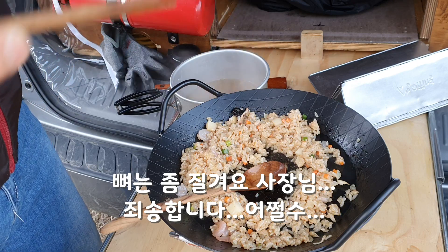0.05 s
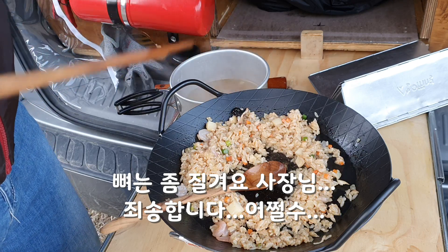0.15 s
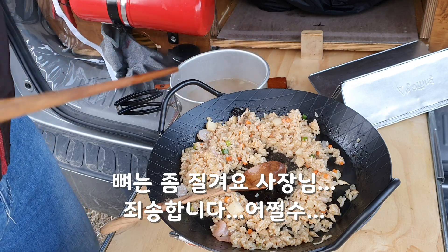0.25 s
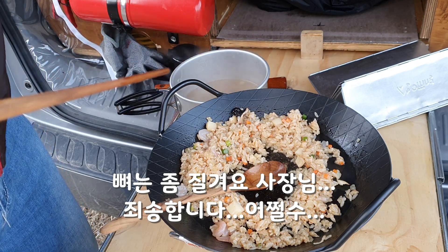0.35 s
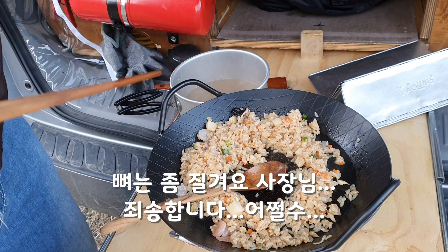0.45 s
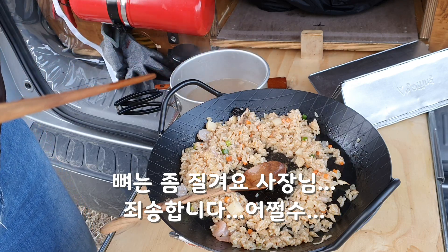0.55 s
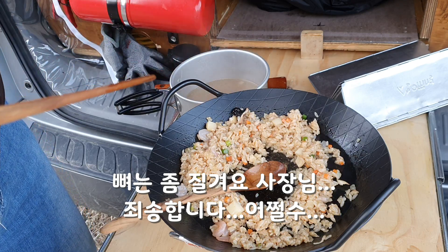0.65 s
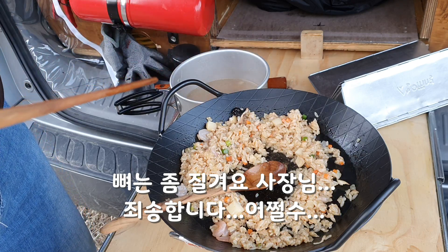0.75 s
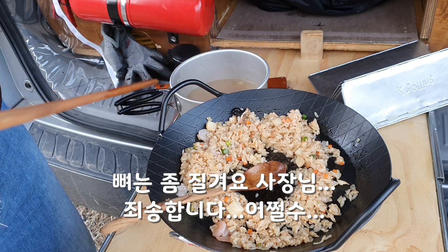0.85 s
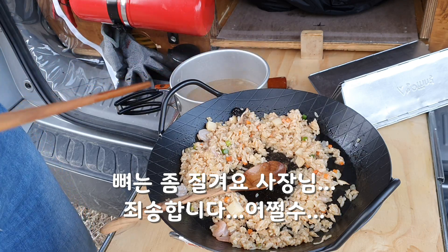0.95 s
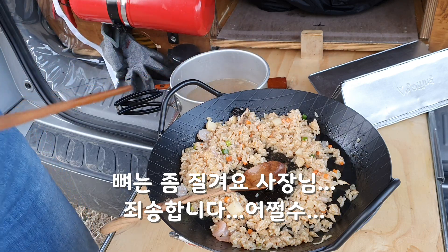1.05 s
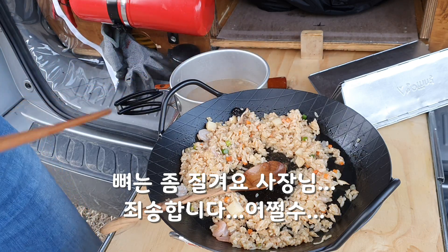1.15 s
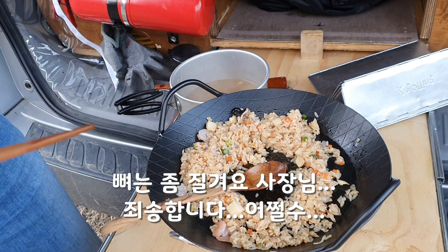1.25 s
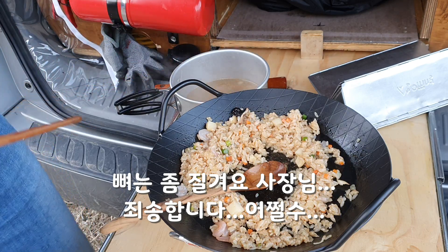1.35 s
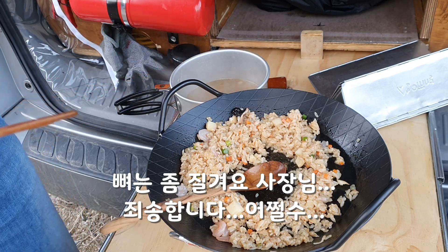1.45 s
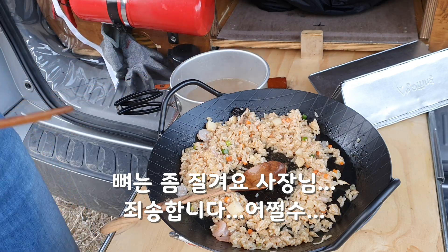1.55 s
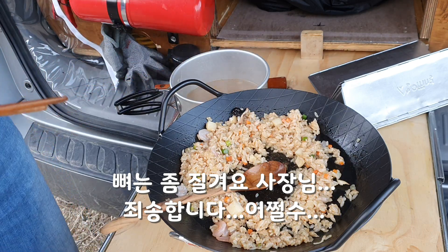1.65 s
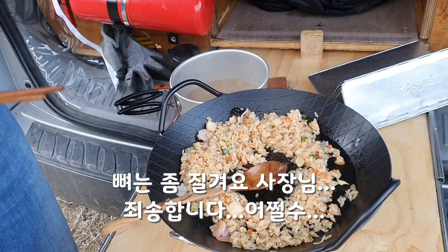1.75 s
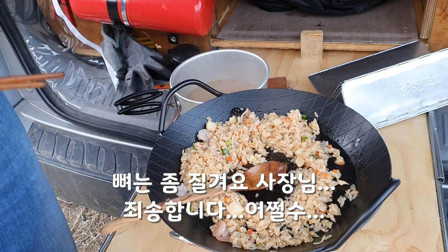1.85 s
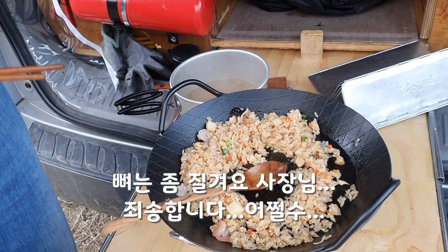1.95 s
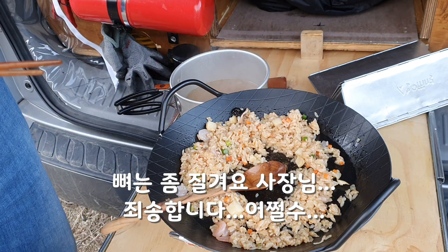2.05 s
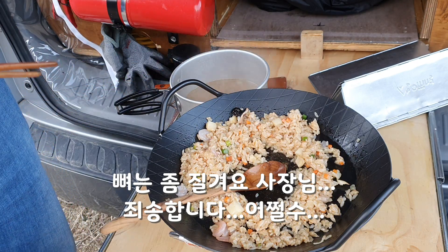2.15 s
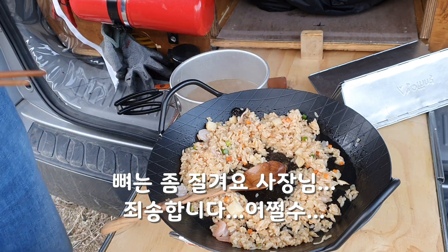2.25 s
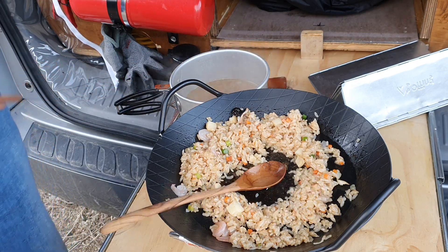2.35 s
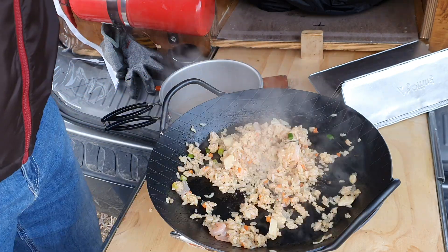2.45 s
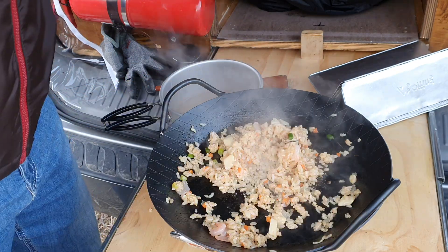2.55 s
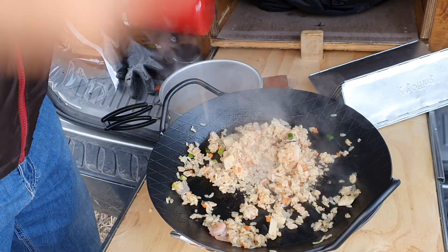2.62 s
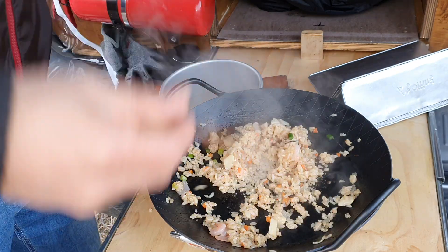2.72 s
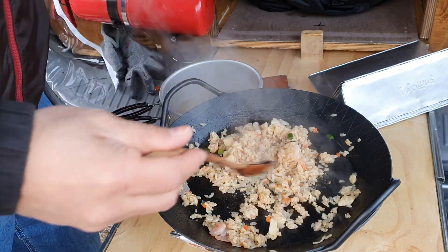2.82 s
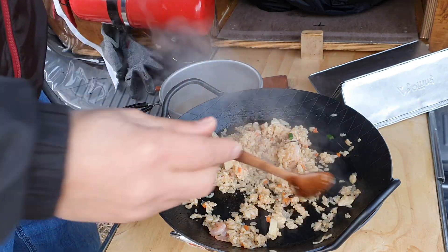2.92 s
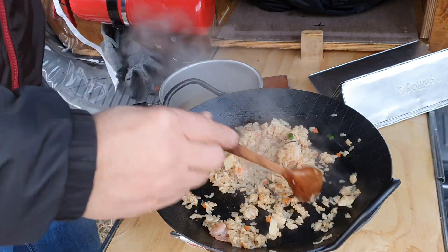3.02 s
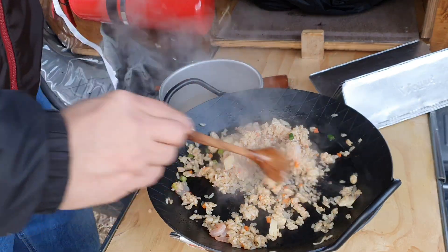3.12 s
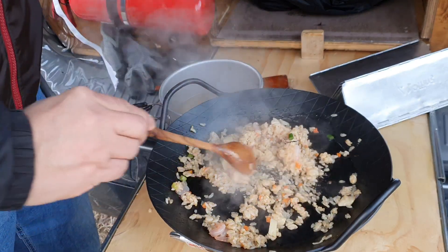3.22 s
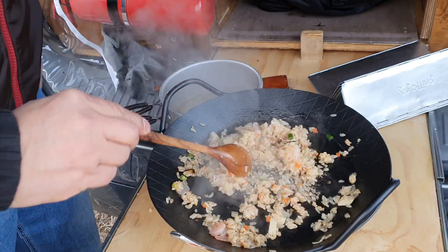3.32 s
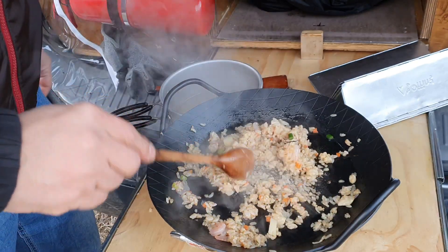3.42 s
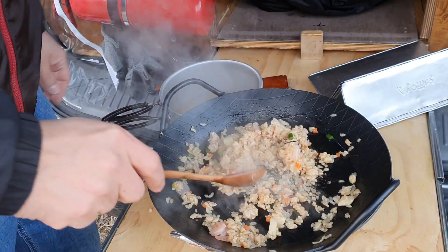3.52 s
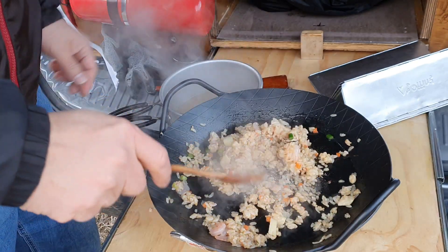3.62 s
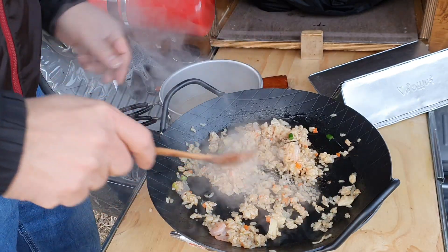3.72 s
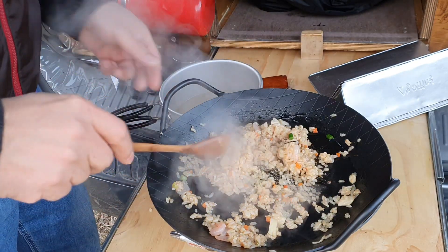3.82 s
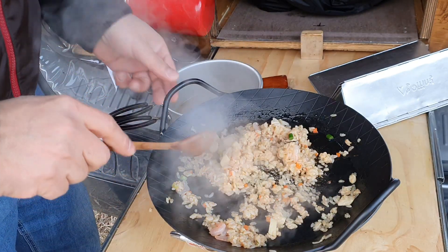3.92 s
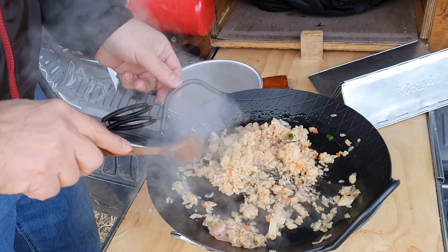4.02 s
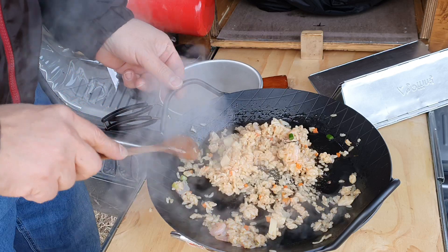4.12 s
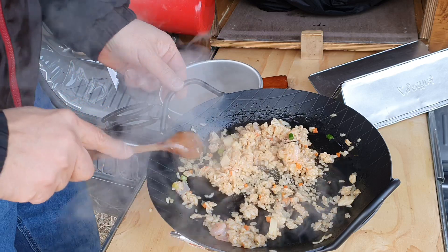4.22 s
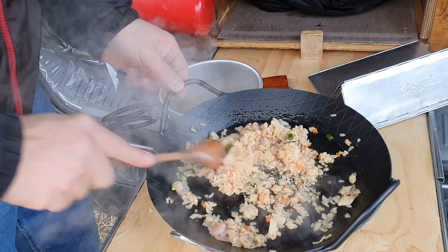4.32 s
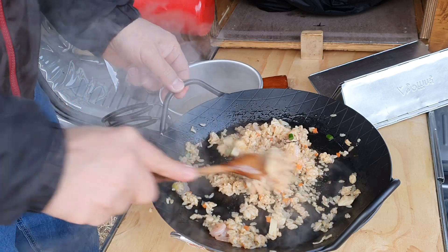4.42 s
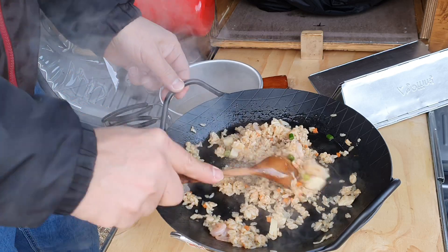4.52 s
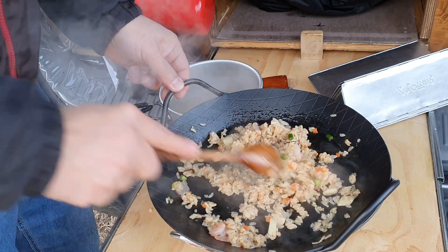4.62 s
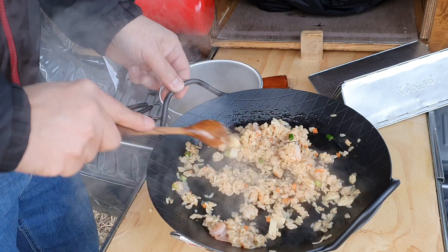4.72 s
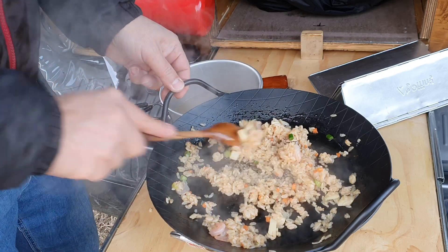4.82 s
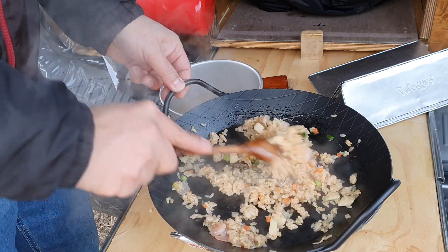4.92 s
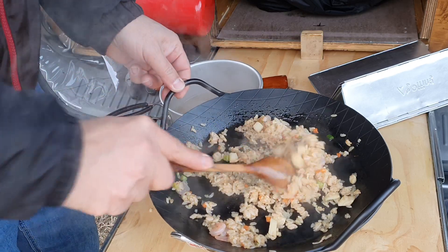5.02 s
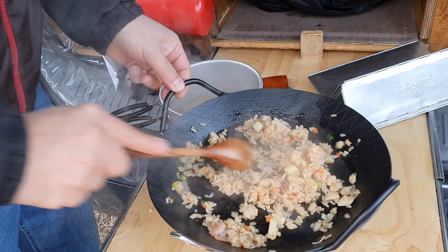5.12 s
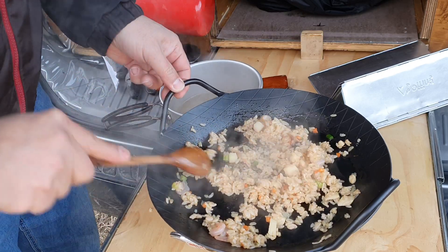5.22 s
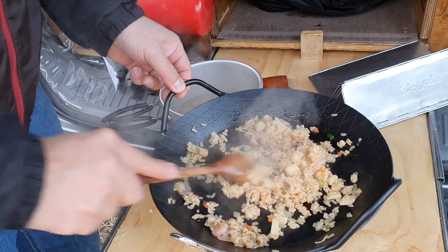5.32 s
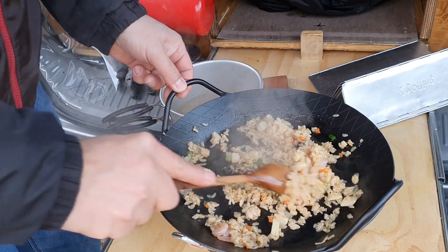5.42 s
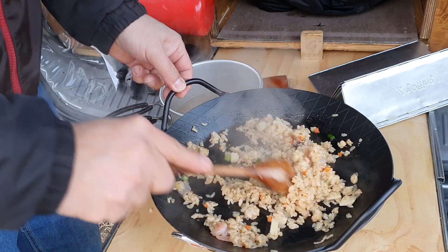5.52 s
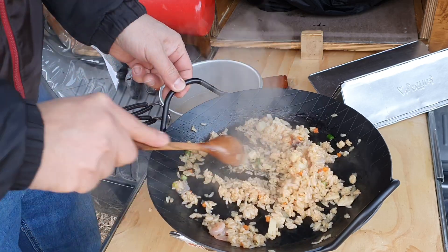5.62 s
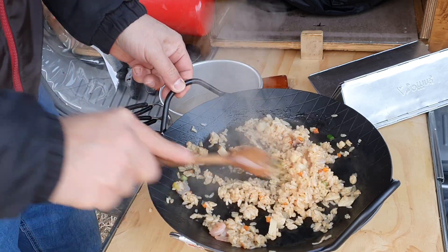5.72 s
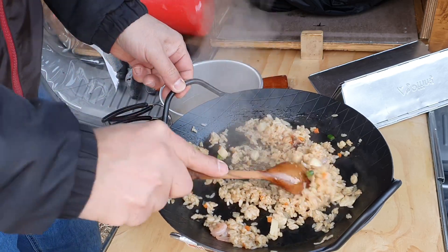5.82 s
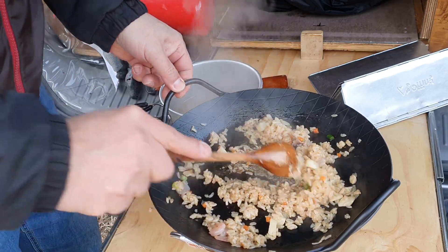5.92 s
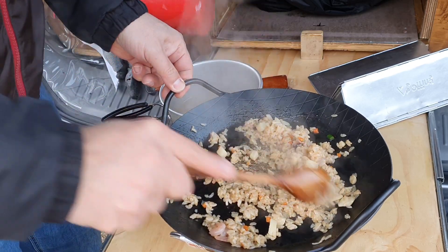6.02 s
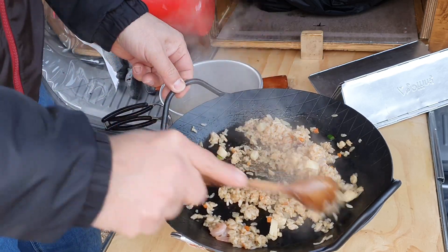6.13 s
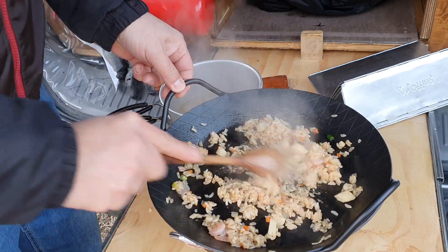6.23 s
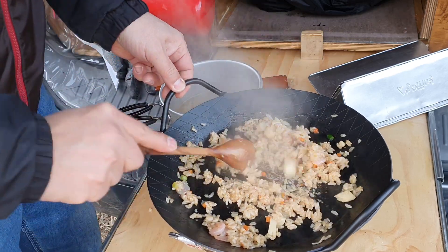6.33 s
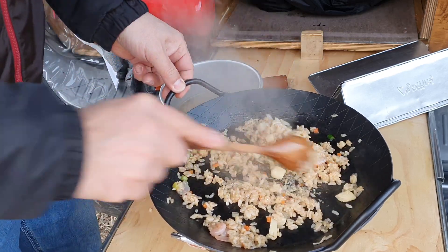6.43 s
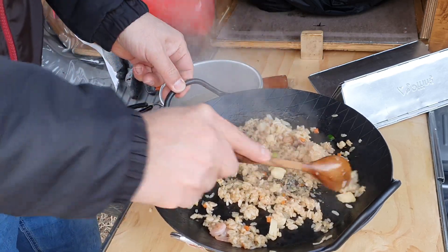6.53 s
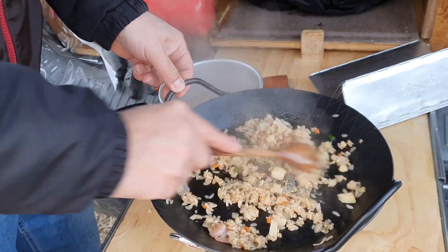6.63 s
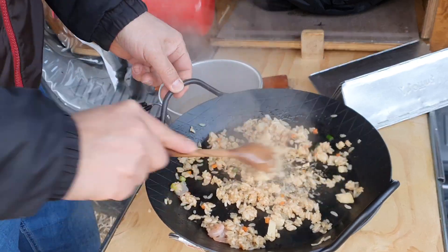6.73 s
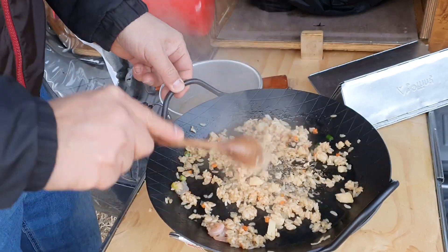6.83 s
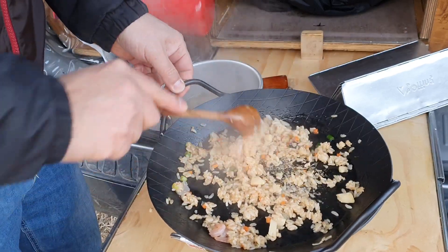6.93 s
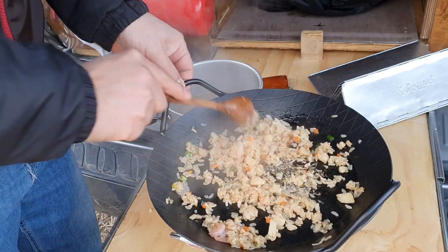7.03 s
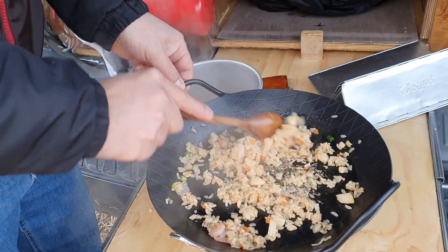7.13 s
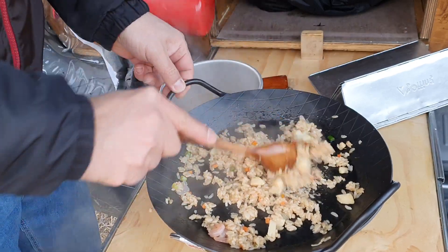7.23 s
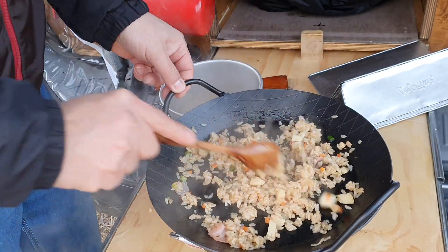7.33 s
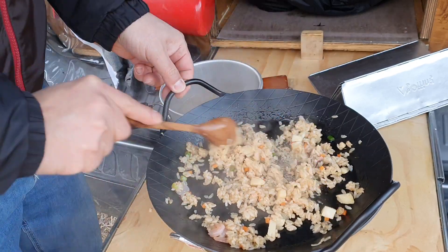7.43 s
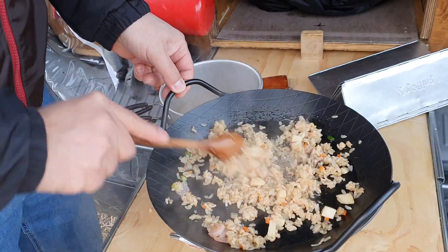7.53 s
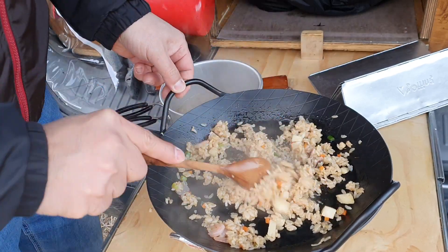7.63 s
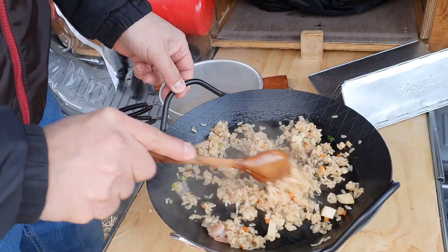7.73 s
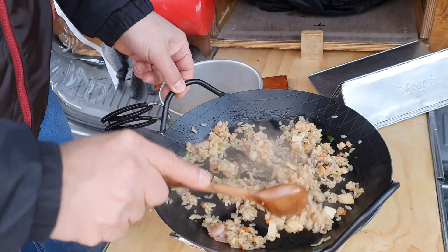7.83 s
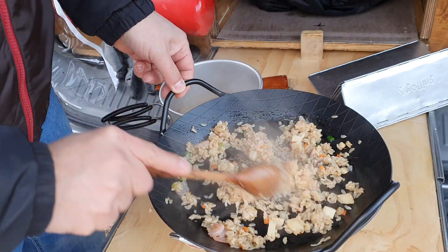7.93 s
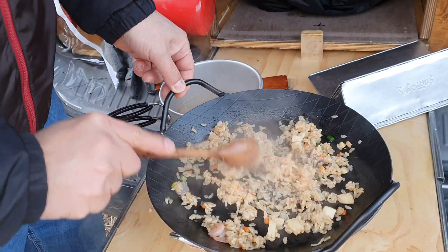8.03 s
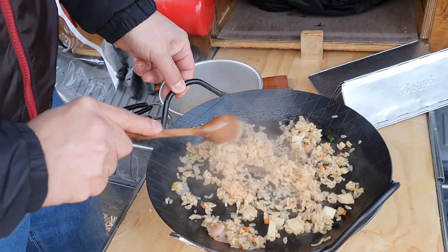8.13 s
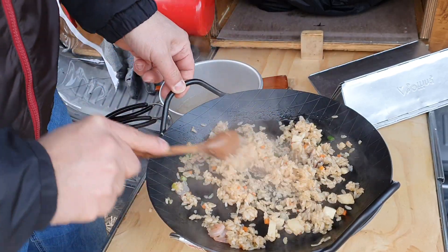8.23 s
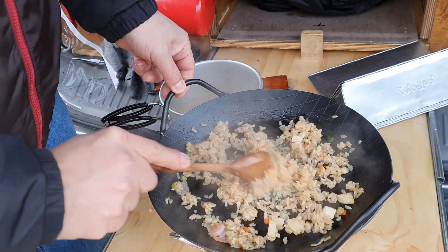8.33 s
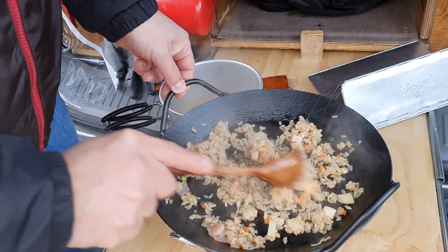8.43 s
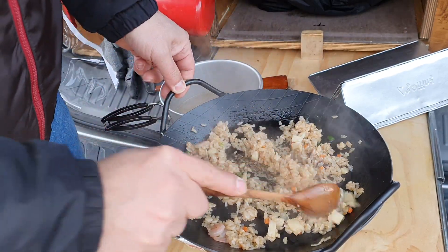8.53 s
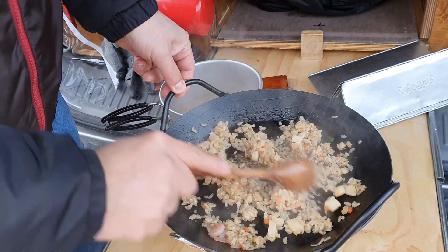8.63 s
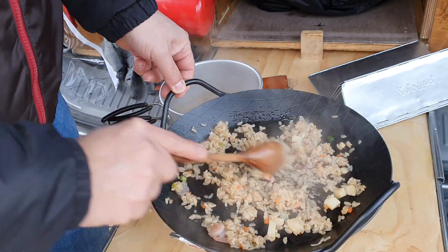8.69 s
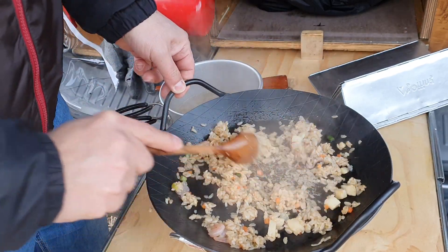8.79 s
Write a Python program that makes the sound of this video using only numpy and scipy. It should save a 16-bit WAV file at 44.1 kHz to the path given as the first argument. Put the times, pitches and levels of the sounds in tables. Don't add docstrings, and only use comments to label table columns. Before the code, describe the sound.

Rice spits quietly in a steel pan under buffeting wind, then abruptly sizzles and pops loudly as a wooden spoon scrapes and knocks the metal.

```python
import sys
import numpy as np
from scipy import signal
from scipy.fft import rfft, irfft, next_fast_len
from scipy.io import wavfile
from scipy.ndimage import uniform_filter1d

SR = 44100
rng = np.random.default_rng(int(sys.argv[2]) if len(sys.argv) > 2 else 0)


def invert_db(x):
    u = np.asarray(x, float) / 20
    return 10 ** u


def inscribe(sig):
    pcm = np.round(np.clip(np.atleast_2d(sig).T, -1, 1) * 32767)
    wavfile.write(sys.argv[1], SR, pcm.astype(np.int16))


N = 390726

# t/s, peak level/dB, centre f/Hz, thump level above crack/dB
POPS = [(2.4483, -25, 6170, -30), (2.628, -15, 8040, -31), (2.668, -19.5, 13500, -27),
        (2.7242, -22.5, 2850, -23), (2.7324, -18, 8390, -24.5), (2.8059, -23, 8190, -20),
        (2.8349, -8, 2600, -17), (2.8923, -19, 9290, -34), (2.9397, -25, 13700, -28),
        (2.9838, -12.5, 2770, -13.5), (3.068, -25, 3500, -18), (3.106, -24, 2500, -12),
        (3.115, -7.5, 6460, -13), (3.1642, -16, 7820, -27), (3.2036, -9, 14400, -32),
        (3.2166, -8.5, 13900, -23), (3.2809, -6, 3950, -26), (3.5229, -24, 13100, -15.5),
        (3.7563, -20, 3990, -22), (3.9874, -10, 4400, -17), (4.0996, -24, 7930, -29),
        (4.2706, -19, 4030, -21), (4.3001, -19.5, 7820, -22), (4.363, -22, 5080, -29),
        (4.4118, -16.5, 7910, -38), (4.4672, -19, 2160, -18), (4.5426, -13, 11400, -26),
        (4.6333, -15.5, 6530, -18), (4.768, -12.5, 13200, -23), (4.797, -17.5, 8170, -26)]
# t/s, peak level/dB, centre f/Hz,
# thump level above crack/dB
CRACKLES = [(4.9093, -3.5, 2760, -18), (4.9835, -24, 3640, -11), (5.017, -16, 5070, -13.5),
            (5.0738, -7.5, 2700, -19), (5.219, -20, 8000, -20), (5.2654, -16, 12900, -24),
            (5.3003, -16.5, 2930, -18.5), (5.4285, -19, 7260, -24), (5.5238, -8.5, 7840, -28),
            (5.545, -11, 6160, -24), (5.5777, -19, 8260, -28), (5.6172, -5, 10500, -26),
            (5.8341, -22, 7490, -25), (5.886, -8, 3000, -12), (5.9528, -11, 2980, -21),
            (6.094, -20.5, 2640, -18), (6.17, -22, 9000, -30), (6.202, -22, 7000, -30),
            (6.337, -13, 13500, -32), (6.4757, -19, 14000, -27), (6.835, -16, 2970, -28),
            (6.9486, -18, 8640, -28), (6.97, -11, 7080, -40), (7.7106, -27, 13400, -16),
            (7.7874, -16.5, 5840, -19), (7.9591, -19, 3000, -11.5), (8.0286, -19, 8170, -30),
            (8.302, -18, 11400, -31), (8.4177, -22, 3960, -13), (3.1199, -12.5, 6800, -15),
            (3.197, -24, 12000, -25), (6.315, -20, 3900, -30)]
# delay t/s, level/dB
ECHOES = [(.0047, -5.5), (.0095, -13), (0.017, -17)]
# f/Hz, width/Hz, level/dB
PAN_LOW = [(545, 17, -10), (545, 49, 1), (609, 30, -1), (685, 43, 2)]
PAN_MIDDLE = [(850, 34, -3), (920.4, 20, 6.5), (1040, 105, -14.5), (1085, 16, 0)]
PAN_HIGH = [(1270, 65, 4), (1356, 36, -4), (1490, 56, 3.5), (1860, 31, 1), (2180, 42, 0), (2430, 120, -2.5)]


def evened(x):
    return x / np.sqrt(np.mean(x ** 2) + 1e-20)


def read(points, hz):
    f, value = np.transpose(points)
    return np.interp(np.log(hz + 1), np.log(f + 1), value)


def level_at(points, t):
    s, db = np.transpose(points)
    return np.interp(t, s, db)


def add(mix, s, sound):
    part = mix[..., round(s * SR):][..., :sound.shape[-1]]
    part += sound[..., :part.shape[-1]]


def coloured(x, points):
    size = next_fast_len(x.shape[-1])
    gain = invert_db(read(points, np.fft.rfftfreq(size, 1 / SR)))
    return irfft(rfft(x, size) * gain, size)[..., :x.shape[-1]]


def highpassed(x, hz):
    return signal.sosfilt(signal.butter(2, hz, "high", fs=SR, output="sos"), x)


def resonate(x, hz, width):
    r = np.exp(-np.pi * width / SR)
    return 2 * signal.lfilter([1 - r], [1, -r * np.exp(2j * np.pi * hz / SR)], x).real


def ring(force, modes):
    return sum(invert_db(db) * resonate(resonate(force, hz, width), hz, 3.9 * width) / np.sqrt(width)
               for hz, width, db in modes)


def drift(shape, seconds):
    size = max(int(seconds * SR), 1)
    return evened(uniform_filter1d(uniform_filter1d(rng.standard_normal(shape), size), size))


def swells(floor_db, events, t):
    power = invert_db(floor_db) ** 2
    for s, db, rise_s, fall_s in events:
        drop_db = 10 * np.maximum((s - t) / rise_s, (t - s) / fall_s)
        power = power + invert_db(db - drop_db) ** 2
    return 10 * np.log10(power)


def fizz(per_s=1100, spread_db=4.9, crack_s=0.0005, hiss=0.8, flutter_db=0.95, body_db=0.71):
    # t/s, level/dB
    heat = [(0.0, -56), (1.4, -57.5), (1.91, -60.5), (2.3, -57.5), (2.43, -58.5), (2.441, -43),
            (2.6, -46.5), (4.3, -46.5), (4.96, -46.5), (5.7, -44), (8.86, -44)]
    # peak t/s, level/dB, 10 dB rise/s, 10 dB fall/s
    flares = [(2.57, -41, .04, .03), (2.92, -43.5, .1, .05), (3.225, -33.5, .008, .05),
              (3.29, -34, .04, .23), (3.455, -42, .06, .03), (3.56, -41, .04, .035), (3.72, -42, .1, .1),
              (8.435, -41, .03, .05), (4.16, -44, .06, .06), (4.3, -43, .06, .03), (4.42, -41, .04, .04),
              (4.642, -33.5, .18, .15), (4.86, -42, .15, .04), (5.035, -34, .03, .1), (5.12, -28, .11, .04),
              (5.2, -40, .05, .2), (5.44, -37.5, .025, .15), (5.61, -33.5, .2, .07),
              (5.885, -36, .04, .035), (5.963, -33, .03, .05), (6.08, -42, .05, .05),
              (6.345, -33.5, .04, .2), (6.8, -32, .035, .1), (6.85, -32, .06, .03), (6.98, -40, .08, .12),
              (7.33, -30.5, .07, .09), (7.63, -42, .1, .1), (7.787, -40, .15, .12),
              (8.085, -32.5, .08, .055), (8.81, -38, .09, .08)]
    # f/Hz, level/dB per Hz
    fizz_colour = [(470, -33), (800, -4), (1090, -3.5), (1170, -5), (1270, -0.5), (1590, -6), (2910, -2.5),
                   (5240, -3.5), (7830, 2), (9940, -2.5), (15000, 3), (16000, -3)]
    spray = [(s + .005, db - 27, .004, .022) for s, db, *_ in POPS + CRACKLES]
    coarse = np.arange(0, N + 64, 64) / SR
    level_db = swells(level_at(heat, coarse), flares + spray, coarse)
    level_db = np.interp(np.arange(N) / SR, coarse, level_db)

    size = invert_db(spread_db * np.minimum(rng.exponential(1, N), 3.9))
    size = size * (rng.random(N) < per_s / SR)
    kind = rng.integers(0, 4, N)
    noise = rng.standard_normal((3, N))
    cracks = 0
    for k, band in enumerate([(1500, 5000), (3500, 9000), (8000, 18000), (1500, 18000)]):
        bursts = signal.lfilter([1], [1, -np.exp(-1 / (crack_s * SR))], size * (kind == k))
        cracks = cracks + signal.lfilter(*signal.butter(1, band, "band", fs=SR), bursts * noise)
    cracks = evened(cracks) * invert_db(-.45 * np.maximum(level_db + 47.5, -4))
    x = coloured(cracks + hiss * rng.standard_normal((3, N)), fizz_colour)
    x = x * invert_db(flutter_db * drift(N, 0.021))
    body = coloured(x, [(900, -15), (2000, -10), (3300, -5), (6000, -6.5), (9000, -15)])
    body = evened(body * invert_db(2.0 * drift(N, 0.0073)))
    return invert_db(level_db + 4.3) * (evened(x) + invert_db(body_db * (level_db + 35.5) - 1.5) * body)


def flame():
    # f/Hz, level/dB per Hz
    roar_colour = [(76, -21), (130, -12), (354, -5), (391, -7.5), (442, -2), (581, -8.5), (699, -1.5),
                   (772, -15), (929, -17.5), (1400, -26), (1490, -21), (2500, -26), (3250, -42),
                   (5500, -120)]
    flutter_db = 1.1 * drift(N, .04)
    roar = evened(coloured(rng.standard_normal((3, N)), roar_colour))
    return invert_db(-51.5 + flutter_db) * roar


def wind(lumpy_db=2.0, left_db=2.5):
    # t/s, level/dB
    breeze = [(0.0, -55), (0.06, -50.5), (1.9, -50.5), (2.43, -62.5)]
    # peak t/s, level/dB, 10 dB rise/s, 10 dB fall/s
    gust_times = [(0.36, -36.5, .08, .025), (0.49, -43, .05, .06), (0.612, -31.5, .025, .12),
                  (0.75, -34, .15, .02), (1.15, -43, .2, .06), (1.35, -41, .1, .08), (1.77, -40, .07, .06)]
    # f/Hz, level/dB per Hz
    wind_colour = [(8.8, -35), (15, -12), (38, -1.5), (65, 1), (95, -3), (135, -17), (200, -24), (260, -51),
                   (440, -120)]
    calm_colour = [(8.8, -54), (15, -24), (27, -10), (41, -15), (65, 2.5), (93, 4), (134, -31), (200, 3.5),
                   (260, -19), (440, -120)]
    t, coarse = np.arange(N) / SR, np.arange(0, N + 64, 64) / SR
    buffet = coloured(rng.standard_normal((2, N)), wind_colour)
    buffet = evened(buffet * invert_db(lumpy_db * drift((2, N), 0.01)))
    level_db = np.interp(t, coarse, swells(level_at(breeze, coarse), gust_times, coarse))
    side_db = np.array([[left_db], [-left_db]]) / 2
    buffet *= invert_db(level_db + 6.5 + side_db) * (t < breeze[-1][0])
    rumble = evened(coloured(rng.standard_normal((2, N)), calm_colour))
    return buffet + invert_db(-58.5) * rumble


def pop(s, db, hz, thump_db):
    t, noise = np.arange(2000) / SR, rng.standard_normal((3, 2000))
    snap = np.array([[-4.0], [0], [0]]) * np.exp(-t / .00004)
    sputter_db = -15 - .2 * (db + 20)
    sputter = invert_db(sputter_db + 4 * drift(2000, .001)) * np.exp(-t / .005)
    crack = snap + noise * (np.exp(-t / .0006) + sputter)
    crack = 0.24 * crack + resonate(crack, hz, 800 + 0.096 * hz)
    crack = highpassed(crack, 1000 + .28 * hz)
    thump = resonate(2 * snap + noise * np.exp(-t / 0.0015), 1150, 700)
    thump = highpassed(resonate(thump, 1450, 1400), 550)
    direct = crack / abs(crack).max() + invert_db(thump_db + 7.5) * thump / abs(thump).max()
    burst = direct.copy()
    rough = noise[0, -40:] * np.exp(-np.arange(40) / 9.)
    smeared = signal.lfilter(rough / np.linalg.norm(rough), 1, direct + direct[::-1])
    for delay, loss_db in ECHOES:
        add(burst, delay, invert_db(loss_db) * smeared / 2)
    return s + .0008, invert_db(db + 6) * burst


def tick(s, db, hz, broad=.3):
    t = np.arange(700) / SR
    puff = rng.standard_normal((3, 700)) * (np.exp(-t / .0005) + .1 * np.exp(-t / .004))
    pitched = resonate(resonate(puff, hz, 1500 + .3 * hz), hz, 3000 + .4 * hz)
    crack = broad * np.diff(puff, prepend=0) + pitched
    crack = crack / abs(crack).max(1, keepdims=True)
    add(crack, ECHOES[0][0], invert_db(-9.0) * crack[::-1].copy())
    return s + .0008, invert_db(db + 2.0) * crack


def brush(start, length, db):
    t = np.arange(0, length, 1 / SR)
    rub = rng.standard_normal((3, len(t))) * invert_db(2.5 * drift(len(t), 0.0014))
    rub = evened(resonate(resonate(rub, 1160, 480), 1160, 1000))
    swell_db = db - 14 * np.interp(t / length, [0, .4, 1], [1, 0, 1])
    return start, invert_db(swell_db) * rub * signal.windows.tukey(len(t), .2)


def stroke(start, length, low_db, middle_db, rasp_db, slips_per_s=1200, spread_db=2.5):
    # f/Hz, width/Hz, level/dB
    stand = [(73, 21, 3), (97, 69, 3)]
    t = np.arange(0, length, 1 / SR)
    low, middle, rasp = (np.interp(t / length, [0, loudest, 1], [1, 0, 1]) ** 1.5
                         for loudest in (.56, .47, .45))
    low_db = low_db - 26 * low
    middle_db = middle_db - 21 * middle
    rasp_db = rasp_db - 4 - 13 * rasp
    slips = invert_db(spread_db * rng.exponential(1, len(t))) * (rng.random(len(t)) < slips_per_s / SR)
    slips = slips * rng.choice([-1., 1.], (3, len(t)))
    out = invert_db(0.34 * low_db - 45.5) * evened(ring(slips, stand))
    for modes, db in ((PAN_LOW, low_db), (PAN_MIDDLE, middle_db), (PAN_HIGH, rasp_db)):
        shaken = ring(slips, modes)
        steady = shaken / (uniform_filter1d(shaken ** 2, 1500) + 1e-9) ** .4
        steady = coloured(steady, [(300, -21), (480, 0)])
        out = out + invert_db(db) * evened(steady)
    return start, out * signal.windows.tukey(len(t), .35)


def knock(s, low_db, middle_db, high_db):
    blow = rng.standard_normal((3, 3000)) * np.exp(-np.arange(3000) / SR / 0.00044)
    rings = [ring(blow, modes) for modes in (PAN_LOW, PAN_MIDDLE, PAN_HIGH)]
    wood = resonate(blow, 1500, 1400)
    levels_db = (0, middle_db, high_db - 1, high_db - 5.0)
    return s, sum(invert_db(low_db + db - 3.0) * r / abs(r).max() for r, db in zip(rings + [wood], levels_db))


def catch(s, db, hz, t60, ragged_db=1.8, waver=.35):
    t = np.arange(0, t60, 1 / SR)
    turns = hz * t + rng.random((3, 1)) + waver / 4 * drift(len(t), .004)
    level_db = db - 2.0 - 62 * (t / t60) ** 1.5 + ragged_db * drift(len(t), .003)
    rise = 1 - np.exp(-t / .0009)
    return s, invert_db(level_db) * rise * np.sin(2 * np.pi * turns)


def ports(x, lag_samples=1.91):
    # f/Hz, share/0-1
    alike = [(100, 1), (300, 0.68), (600, 0.84), (1200, 0.32), (2500, 0.4), (5000, 0.49), (9000, 0),
             (15000, 0)]
    size = next_fast_len(N)
    hz, z = np.fft.rfftfreq(size, 1 / SR), rfft(x, size)
    share = np.sqrt(np.clip(read(alike, hz), 0, 1))
    late = np.exp(-2j * np.pi * hz / SR * np.array([[lag_samples], [0]]))
    return irfft(share * late * z[0] + np.sqrt(1 - share ** 2) * z[1:], size)[:, :N]


def scene():
    # t/s, peak level/dB, centre f/Hz, thump level above crack/dB
    spits = [(0.0164, -28, 7500, -22), (0.1037, -23, 11900, -34), (0.2209, -27, 14200, -28),
             (0.2728, -24, 7100, -30), (0.2773, -20, 7200, -35), (0.3047, -35, 3420, -21),
             (0.394, -21, 3100, -36), (0.398, -15, 5800, -40), (0.5484, -28, 7000, -25),
             (0.7048, -29, 12500, -37), (0.7502, -30, 12000, -30), (0.7861, -26, 11900, -26),
             (0.9193, -34, 8580, -24), (0.9358, -30, 6150, -26), (1.1378, -34, 12800, -21),
             (1.1508, -29, 8300, -28), (1.18, -24, 13000, -29), (1.387, -29.5, 5580, -20),
             (1.479, -21, 14400, -34), (1.6426, -35, 14400, -25), (1.7115, -35, 5410, -26),
             (1.8906, -34, 11500, -18), (1.9067, -29.5, 5490, -36), (2.1658, -26, 7840, -23),
             (2.1868, -15, 7200, -29.5), (2.347, -23, 11100, -20.5), (2.4269, -29, 5380, -26)]
    # t/s, peak level/dB, centre f/Hz
    ticks = [(0.0344, -35, 8140), (0.0722, -34, 11600), (0.1844, -34, 6570), (0.3556, -31, 15400),
             (0.5117, -36, 7470), (0.6674, -34, 3050), (0.7144, -35, 11600), (0.7554, -34, 13300),
             (0.8779, -36, 3360), (1.0086, -31, 5250), (1.2164, -36, 4000), (1.3638, -28, 10700),
             (1.4374, -39, 5300), (1.5908, -36, 14400), (1.9535, -38, 3000), (2.2603, -35, 15300),
             (2.2942, -34, 13000), (2.5084, -23, 7320), (2.5691, -23, 8260), (2.7546, -26, 7570),
             (2.8754, -19, 3560), (3.2334, -17, 5720), (3.5508, -18, 3200), (3.6681, -24, 6410),
             (3.7304, -24, 7050), (3.9994, -19, 7980), (4.152, -25, 15400), (4.1714, -24, 8270),
             (4.3054, -19, 14900), (4.4184, -20, 4910), (4.6034, -16, 6320), (4.7301, -19, 7790),
             (4.8094, -18, 15700), (4.8329, -24, 3420), (5.0554, -10, 4350), (5.1013, -11, 3710),
             (5.1174, -10, 2640), (5.1244, -12, 6370), (5.3054, -19, 14300), (5.6214, -13, 15300),
             (6.7062, -24, 15100), (6.7955, -15, 2970), (6.8474, -12, 3390), (7.0034, -21, 13400),
             (7.008, -20, 8420), (7.1053, -21, 15500), (7.1357, -24, 14200), (7.2245, -24, 13500),
             (7.2444, -24, 4730), (7.6246, -20, 14400), (7.877, -22, 6310), (8.4357, -17, 11800),
             (8.4821, -23, 8260), (8.7814, -24, 2990)]
    # t/s, length/s, level/dB
    brushes = [
        (1.5, .065, -37),
        (1.567, .063, -47),
    ]
    # t/s, length/s, low modes level/dB, middle modes level/dB, rasp level/dB
    strokes = [(3.31, .075, -34, -53, -47), (4.45, .24, -32.5, -38, -42), (4.965, .17, -35.5, -33, -33),
               (5.08, .09, -44, -44, -39), (5.37, .035, -52, -47, -39), (5.41, .075, -37, -41, -32),
               (5.47, .14, -35, -39, -35), (5.848, .117, -26, -32, -30), (6.292, .055, -43, -43, -35),
               (6.36, .085, -34, -35, -36), (6.74, .15, -44, -43, -33), (6.83, .12, -41, -55, -48),
               (7.25, .17, -47, -43, -40), (7.33, .11, -44, -50, -50), (7.66, .12, -30, -33, -46),
               (8.035, .11, -54, -45, -56), (8.375, .11, -36, -38, -46), (8.695, .05, -44, -42, -47),
               (8.745, .1, -42, -37, -42)]
    # t/s, low modes peak level/dB, middle and high level above those/dB
    knocks = [(3.326, -44, -20, -16), (5.374, -39, 4, 15), (5.423, -25, -9, -5), (5.484, -30, -3, 3),
              (5.883, -14, -13, -11), (6.296, -30, 0, 9), (6.322, -42, 2, 1), (6.372, -25, -4, -11),
              (7.704, -21, -15, -25), (8.42, -24, -15, -20), (8.714, -34, 5, -8), (8.785, -30, 4, 4)]
    # t/s, peak level/dB, f/Hz, t60/s
    catches = [(4.467, -34, 2170, .06), (4.565, -31, 915, .14), (4.523, -29, 530, .1), (4.55, -31, 668, .1),
               (4.585, -26, 600, .12), (5.028, -22, 939, .12), (5.054, -22, 1090, .05),
               (5.101, -27, 2200, .06), (5.155, -31, 1260, .04), (5.375, -33, 934, .07),
               (5.441, -30, 1470, .08), (5.452, -28, 690, .07), (5.481, -25, 1700, .05),
               (5.488, -27, 820, .08), (5.515, -28, 560, .12), (5.517, -33, 1835, .15),
               (5.54, -28, 920, .1), (5.546, -26, 600, .1), (5.57, -30, 900, .07), (5.854, -32, 690, .1),
               (5.893, -20, 689, .08), (5.905, -19, 600, .1), (5.934, -29, 940, .1),
               (6.296, -27, 1240, .04), (6.321, -28, 923, .07), (6.372, -24, 533, .1),
               (6.386, -25, 560, .07), (6.403, -25, 1050, .06), (6.417, -30, 550, .13),
               (6.78, -32, 1450, .1), (6.804, -29, 2950, .07), (6.822, -31, 1450, .1),
               (6.878, -37, 600, .12), (7.319, -29, 1270, .06), (7.352, -29, 921, .08),
               (7.677, -30, 545, .08), (7.677, -30, 942, .12), (7.71, -22, 934, .15), (7.72, -18, 680, .09),
               (8.069, -33, 921, .1), (8.403, -31, 692, .08), (8.421, -24, 600, .045),
               (8.421, -24, 1000, .05), (8.44, -22, 925, .08), (8.447, -22, 600, .07),
               (8.714, -33, 934, .1), (8.764, -30, 923, .08), (8.79, -31, 931, .15), (8.797, -35, 560, .1),
               (8.845, -37, 550, .1)]
    pan = fizz() + flame()
    for source, events in ((pop, spits + POPS + CRACKLES), (tick, ticks), (brush, brushes),
                           (stroke, strokes), (knock, knocks), (catch, catches)):
        for event in events:
            add(pan, *source(*event))
    return ports(pan) + wind()


def low_pass(x):
    return signal.sosfilt(signal.butter(12, 16980, fs=SR, output="sos"), x)


def record(dry):
    limited = coloured(dry, [(15800, 0), (15950, -45), (16900, -60), (17000, -100)])
    return low_pass(limited)


dry = scene()
out = record(dry)
inscribe(out)
```